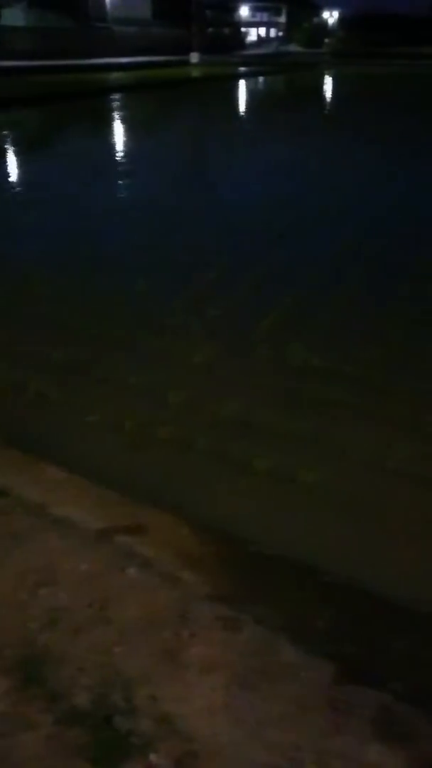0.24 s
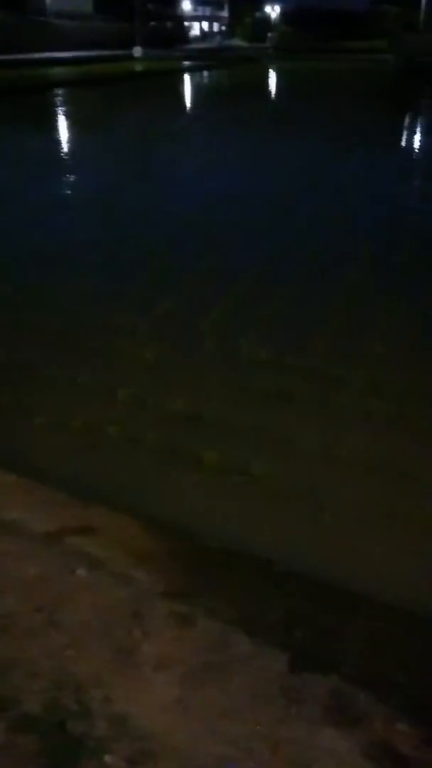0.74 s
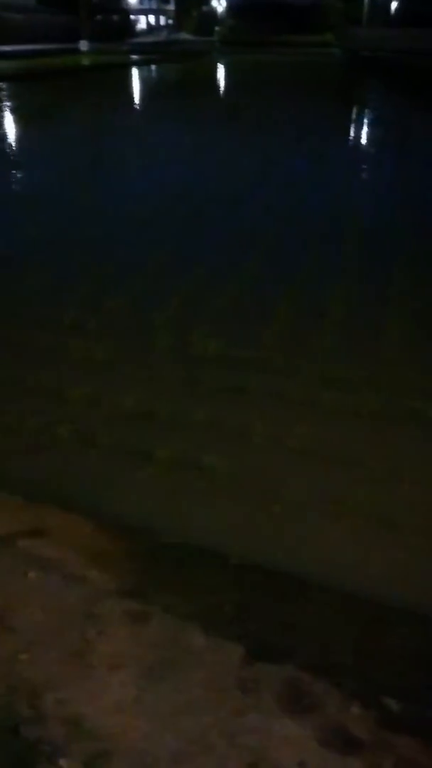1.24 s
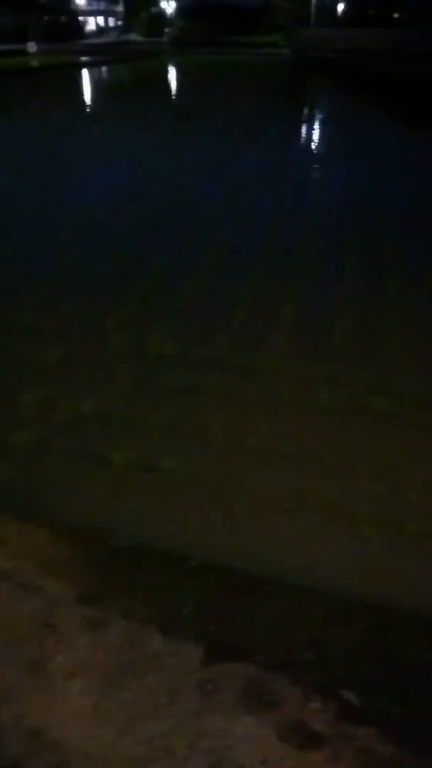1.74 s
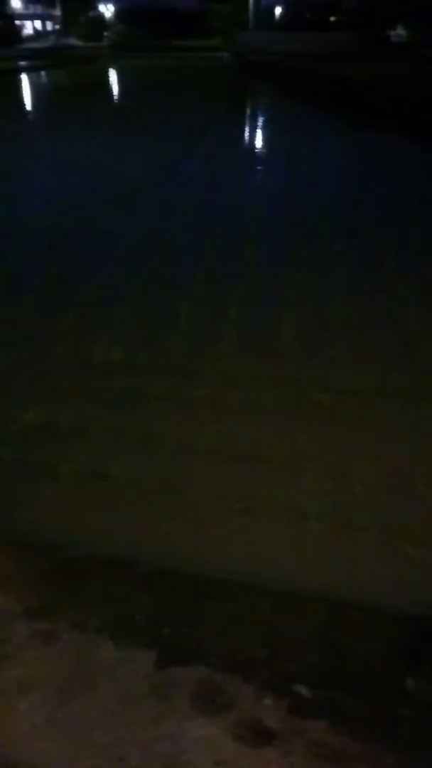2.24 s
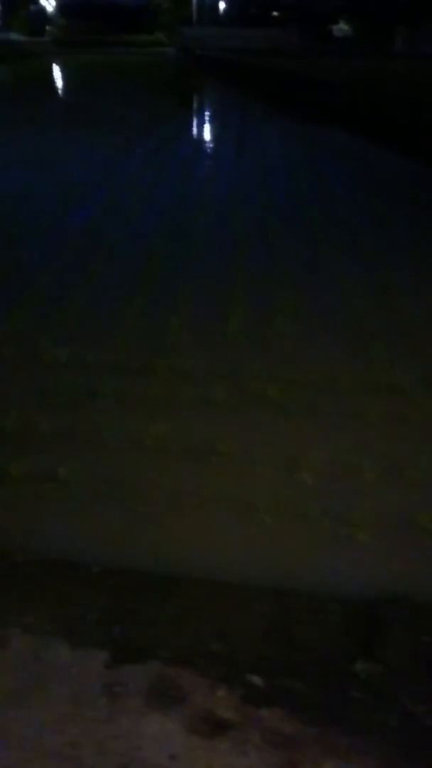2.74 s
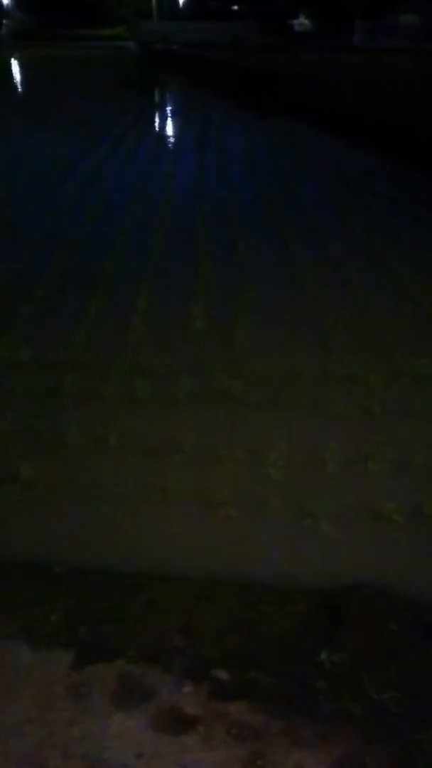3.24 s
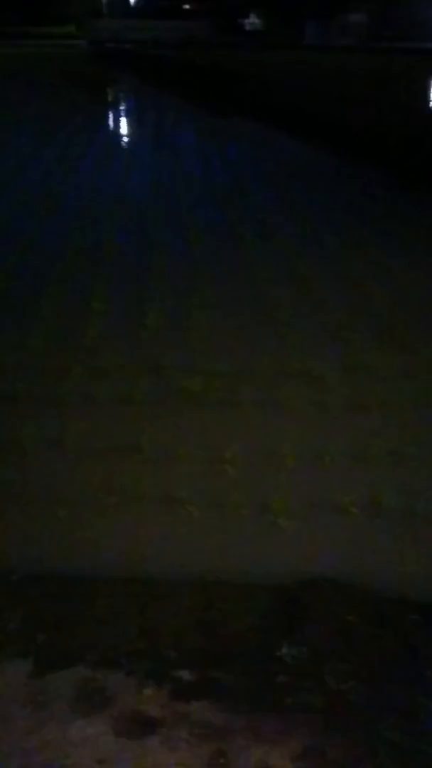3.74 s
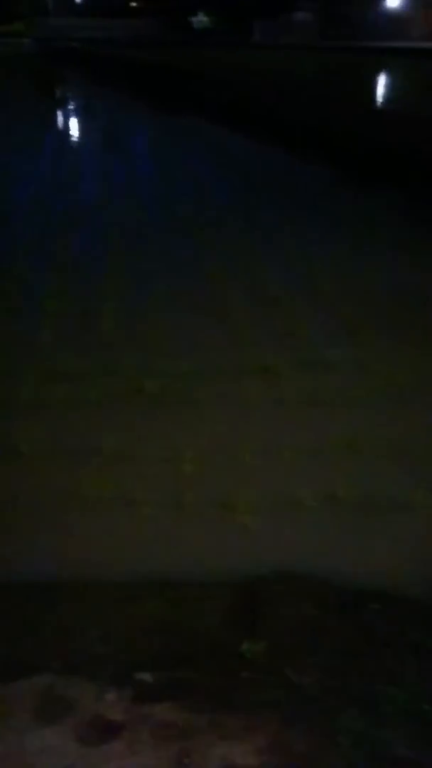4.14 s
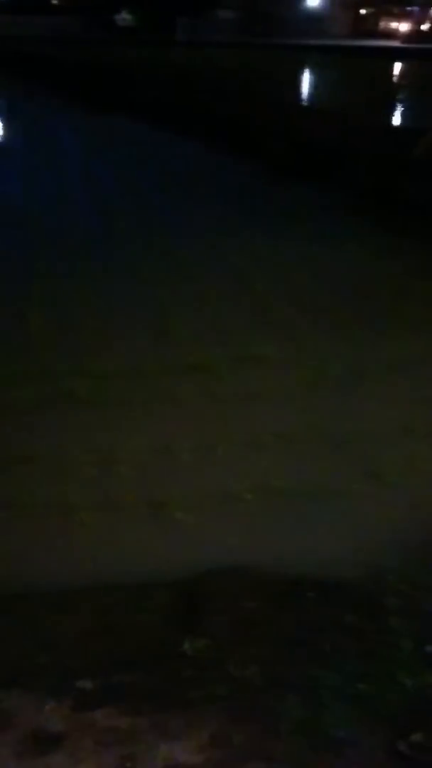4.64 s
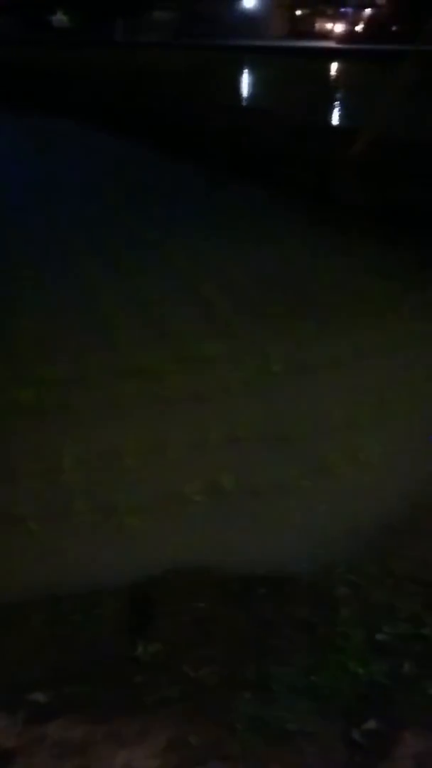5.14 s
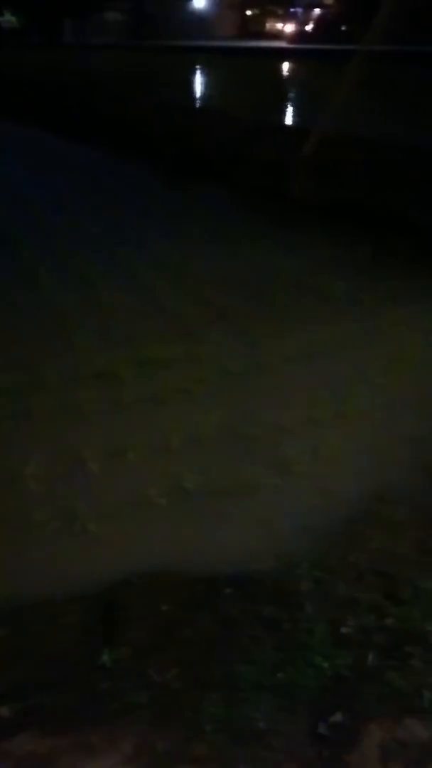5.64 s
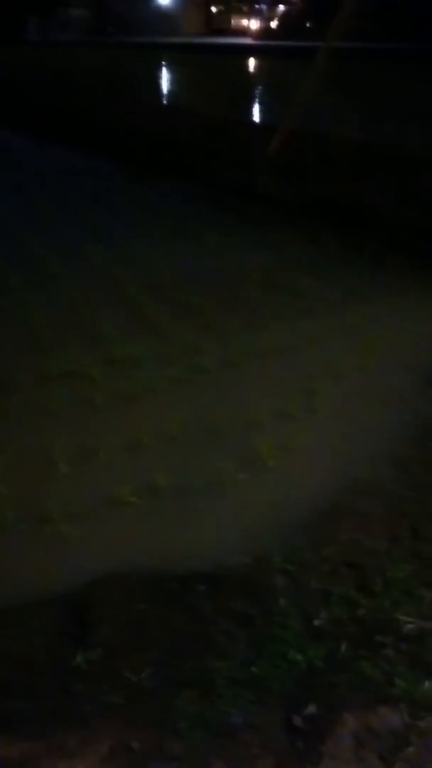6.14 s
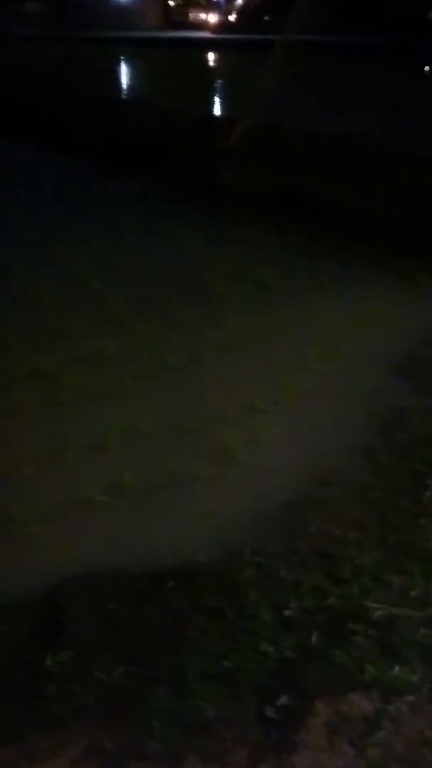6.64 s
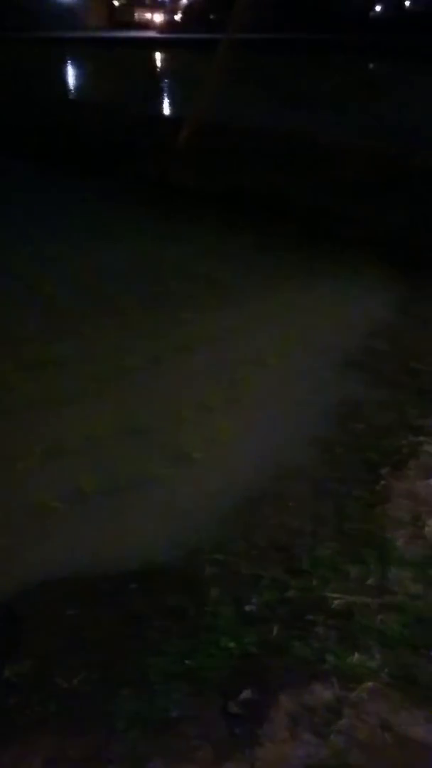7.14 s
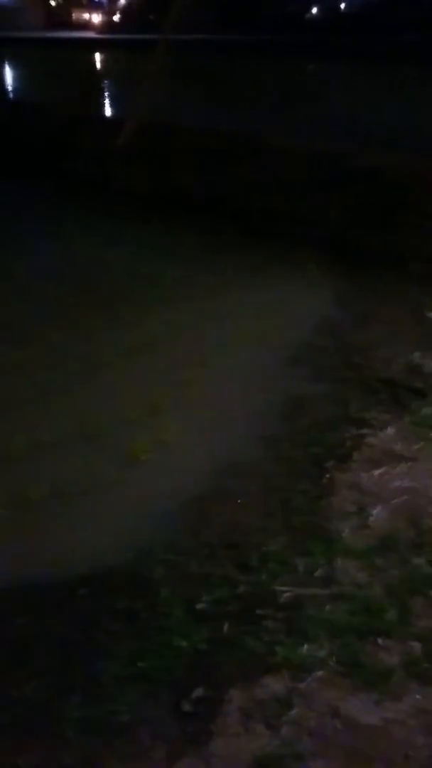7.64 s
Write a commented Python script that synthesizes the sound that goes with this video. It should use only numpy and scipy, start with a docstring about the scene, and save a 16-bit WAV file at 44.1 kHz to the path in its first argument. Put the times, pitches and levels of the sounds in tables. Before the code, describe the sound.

Bright, buzzing croaks from a handful of nearby frogs overlap in even runs throughout, each voice at a slightly different pitch and most a little to the right. Far-off frogs blend into a faint shimmer across the open, flooded field. Low puffs of wind brush the microphone from one side and then the other, bumping it most noticeably toward the end.

```python
"""Frogs croak in even bouts, close by in a flooded field at night, over a far chorus and a low rumble.
Each croak is a source driving a filter: a train of vocal pulses rings the resonances of the throat and
vocal sac, rising in pitch as it goes. Water and banks scatter the calls. The rumble is turbulence:
a light breeze presses on the two ports of the microphone."""
import sys
import numpy as np
from scipy import signal
from scipy.fft import rfft, irfft, next_fast_len
from scipy.io import wavfile
from scipy.ndimage import uniform_filter1d

SR = 44100
rng = np.random.default_rng(int(sys.argv[2]) if len(sys.argv) > 2 else 0)


def generate_wav(signal):
    """Clip the signal to [-1, 1] and save it as 16-bit WAV at the path in sys.argv[1]."""
    frames = np.transpose(np.atleast_2d(signal))
    scaled = np.clip(frames, -1, 1) * 32767
    pcm = np.round(scaled).astype(np.int16)
    wavfile.write(sys.argv[1], SR, pcm)


N = 347067


def undb(db):
    """Amplitude ratio of a level in decibels."""
    return 10 ** (np.asarray(db) / 20)


def unit(x):
    """Normalisation to an rms of 1."""
    return x / np.sqrt(np.mean(x ** 2) + 1e-20)


def sides(pan_db):
    """Level difference: the two gains that put left pan_db above right."""
    return undb(np.array([[pan_db], [-pan_db]]) / 2)


def colour(x, points):
    """Spectral shaping by a curve of (Hz, dB) points."""
    hz, db = np.transpose(points)
    size = next_fast_len(x.shape[-1])
    f = np.maximum(np.arange(size // 2 + 1) * SR / size, 1)
    gain = undb(np.interp(np.log(f), np.log(hz), db))
    return irfft(rfft(x, size) * gain, size)[..., :x.shape[-1]]


def below(x, hz):
    """Zero-phase low-pass filtering."""
    return signal.sosfiltfilt(signal.butter(2, hz, fs=SR, output="sos"), x)


def walk(rate):
    """Smooth random modulation of rms 1, changing about rate times a second."""
    k = int(SR / rate)
    steps = np.repeat(rng.standard_normal(N // k + 1), k)
    return unit(uniform_filter1d(uniform_filter1d(steps, k), k)[:N])


def add(track, sound, start_s):
    """Superposition of a sound on a track."""
    i = int(start_s * SR)
    a, b = max(i, 0), min(i + sound.shape[-1], track.shape[-1])
    if b > a:
        track[..., a:b] += sound[..., a - i:b - i]


def ports(x, lag_ms):
    """Path difference: sound reaches the left port before the right."""
    return np.array([x, np.roll(x, round(lag_ms * SR / 1000))])


def scatter(x, t60_s, size):
    """Diffuse reflections decay exponentially, uncorrelated left and right."""
    t = np.arange(size) / SR
    envelope = np.exp(-np.log(1000) * t / t60_s) * (1 - np.exp(-t / 0.0016))
    tail = unit(rng.standard_normal((2, size)) * envelope) / np.sqrt(size)
    return signal.fftconvolve(x, tail, axes=1)[:, :x.shape[1]]


def ring(age, ring_s):
    """Damped pulse envelope of unit energy: a rounded rise, then exponential decay."""
    return (age / ring_s) ** 2 * np.exp(-age / ring_s) / np.sqrt(ring_s * 3 / 4)


def far_chorus():
    """Incoherent summation: countless distant croaks merge into a fluttering wash over the night air."""
    # Each row: frequency in Hz, relative spectral level in dB.
    spectrum = [(30, -11), (70, -6.5), (150, -3.5), (300, -6), (600, -8.5), (1050, -11), (1600, 4),
                (2300, -7.5), (3350, 2), (4200, -17), (5500, -30.5), (8000, -40), (11000, -69.5),
                (14000, -51)]
    # Each row: time in seconds, gain of the wash in dB.
    swell = [(0, 0.5), (2.999, 3), (5.899, 3.5), (6.9, -4), (7.87, 1.5)]
    common, apart = rng.standard_normal(N), rng.standard_normal((2, N))
    air = below(unit(colour(common + 0.33 * apart, spectrum)), 1300)
    wash = unit(colour(.5 * ports(common, lag_ms=0.13) + apart, spectrum))
    flutter = undb(2 * walk(11) + 2 * walk(350))
    drift = undb(np.interp(np.arange(N) / SR, *np.transpose(swell)))
    chorus = (wash - below(wash, 1100)) * flutter * drift
    return undb(-48.5) * (air * sides(0.79) + chorus * sides(-4))


def gusts():
    """Wind envelope at each port: gusts rise, hold and die away, adding in power to a faint draught."""
    # Each row: start in seconds, hold in seconds, left level in dB, right level in dB.
    gust_events = [(0.103, 0.041, -34, -51), (0.176, 0.058, -49, -19), (.3, 0.22, -67, -29),
                   (0.653, 0.07, -66, -27), (.84, 0.25, -63, -36), (1.72, 0.081, -63, -43),
                   (1.934, 0.026, -62, -31.5), (2.189, 0.031, -68, -35.5), (2.538, 0.076, -50, -36.5),
                   (2.684, 0.27, -44, -45.5), (2.99, .18, -59, -29.5), (3.77, 0.038, -38, -55),
                   (4.05, 0.034, -38.5, -43.5), (4.282, 0.14, -27, -35), (4.508, 0.14, -36.5, -31),
                   (4.729, 0.18, -28.5, -40), (5.033, 0.047, -35, -46), (5.358, 0.24, -47.5, -48),
                   (5.64, 0.034, -29, -54), (5.817, 0.16, -34.5, -51), (6.1, 0.13, -32.5, -50),
                   (6.289, 0.18, -34, -34), (6.525, .15, -47, -36), (6.726, 0.025, -53, -30),
                   (6.958, 0.031, -30, -51), (7.245, 0.039, -32, -23.5), (7.406, 0.15, -38, -24.5),
                   (7.633, 0.28, -39, -26)]
    rise_s, fall_s, calm_db = 0.033, 0.074, [[-61.5], [-51.5]]
    t = np.arange(N) / SR
    power = undb(calm_db) ** 2
    for start, hold, left_db, right_db in gust_events:
        shape = np.exp(-np.maximum(start - t, 0) / rise_s - np.maximum(t - start - hold, 0) / fall_s)
        power = power + (undb([[left_db], [right_db]]) * shape) ** 2
    return np.sqrt(power)


def breeze():
    """Turbulent pressure: eddies rumble on each port separately, and a sharp one thumps."""
    # Each row: frequency in Hz, relative spectral level in dB.
    rumble = [(20, -44), (32, -36), (42, -9), (54, 6.5), (85, 5.5), (115, 2.1), (160, -5.5), (240, -14.5),
              (320, -22.5), (450, -43), (900, -58.5), (2000, -90)]
    # Each row: start in seconds, peak before panning in dB, left minus right in dB.
    buffets = [(0.222, -28, -25), (0.684, -41, -23), (0.945, -36.5, -27), (1.913, -42, -12),
               (4.315, -29, 15), (4.859, -41, 16), (6.99, -31.5, 14), (7.283, -21.5, -17),
               (7.414, -29, -18), (7.452, -29.5, -16.5), (7.527, -32.5, -23), (7.631, -21.5, -10)]
    eddies = rng.standard_normal((2, N)) * undb(4.8 * np.array([walk(70), walk(70)]))
    out = unit(colour(eddies, rumble)) * gusts()
    push = ring(np.arange(SR // 8) / SR, 0.0011)
    thump = signal.sosfilt(signal.butter(4, 55, "high", fs=SR, output="sos"), push)
    thump /= np.max(np.abs(thump))
    for start, peak_db, pan_db in buffets:
        add(out, undb(peak_db) * thump * sides(pan_db), start)
    return out


def port_shading(x):
    """Diffraction round the microphone body colours each port and shifts the phase of the right one."""
    # Each row: frequency in Hz, left gain in dB, right gain in dB, right phase lag in radians.
    port_response = [(1100, -6.5, -0.5, -.3), (1670, -4, -2.5, -0.86), (1990, -3, 3.5, -0.73),
                     (2490, -7, 0.5, -0.7), (2920, 0, 0, 0.32), (3730, -1, -0.5, 0.22),
                     (4700, 4.5, -1.5, .1), (6500, 4.5, -5.5, -.9), (8040, -2.5, 1.5, -0.83),
                     (10500, -3.5, 4, -1.1)]
    size = next_fast_len(N + SR // 10)
    f = np.maximum(np.arange(size // 2 + 1) * SR / size, 1)
    hz, *columns = np.transpose(port_response)
    left_db, right_db, lag = (np.interp(np.log(f), np.log(hz), c) for c in columns)
    response = np.array([undb(left_db), undb(right_db) * np.exp(-1j * lag)])
    return irfft(rfft(x, size) * response, size)[:, :N]


def croak(length, hz, modes, air, pressure, pulse_hz, quicken, glide, jitter, pulses=32):
    """Impulse excitation: each pulse of a quickening train rings the modes and lets out a puff of air."""
    t = np.arange(int(1.25 * length * SR)) / SR
    period_noise, level_noise, pitch_noise = rng.standard_normal((pulses, 3)).T
    rate = pulse_hz * (1 + .02 * rng.standard_normal())
    speedup = 1 + quicken * (np.arange(pulses) / (rate * length) - .5)
    periods = (1 + jitter * period_noise) / (rate * speedup)
    onsets = np.cumsum(periods) - periods[0] * rng.uniform(0.5038, 1)
    progress = onsets / length - .1
    strength = np.interp(progress, *np.transpose(pressure)) * undb(0.22 * level_noise) / np.sqrt(rate)
    pitch = hz * (1 + glide * (np.clip(progress, 0, 1) - .6) + 0.0025 * pitch_noise)
    pulse = np.maximum(np.searchsorted(onsets, t) - 1, 0)
    age = np.maximum(t - onsets[pulse], 0)
    shut = np.minimum(onsets[np.minimum(pulse + 1, pulses - 1)], t[-1])
    closing = np.clip((shut - t) / 0.00056, 0, 1)  # the folds shut before the next pulse
    turns = pitch[pulse] * (age - 10.6 * (age - .0013) ** 2)  # tension sags within each pulse
    out = ring(age, .00065) * air[:len(t)]
    climax = np.exp(-((progress[pulse] - .48) / 0.3) ** 2)  # the last mode speaks at the height of the push
    for k, (multiple, ring_ms, db) in enumerate(modes):
        tone = np.sqrt(2) * np.sin(2 * np.pi * (multiple * turns + rng.random()))
        out += undb(db) * ring(age, ring_ms / 1000) * tone * (climax if k == len(modes) - 1 else 1)
    return out * strength[pulse] * np.sin(np.pi / 2 * closing) ** 2


def bouts(table, length_s, uneven_db=0.96):
    """Periodic calling: a list of evenly spaced croaks that swell or tire through each bout."""
    croaks = []
    for start, end, beat, hz, db, swell_db, *tone in table:
        times = np.arange(start, end, beat)
        for k, time in enumerate(times):
            level_db = db + swell_db * (k - (len(times) - 1) / 2) + uneven_db * rng.standard_normal()
            croaks.append((time, length_s, hz, level_db, *tone))
    return croaks


def frog(croaks, modes, rasp_db, banks_db, lag_ms, **voice):
    """Direct sound and early reflections: one frog's croaks, returned by water and banks."""
    # Turbulent breath. Each row: frequency in Hz, relative spectral level in dB.
    rasp = [(600, -32), (1200, -6), (1600, -2), (2300, 0), (3500, -1), (4200, -10), (5500, -19),
            (8500, -29), (10000, -46), (14000, -66)]
    out = np.zeros((2, N))
    air = undb(rasp_db) * unit(colour(rng.standard_normal(N), rasp))
    for start, length, hz, db, fundamental_db, pan_db, *overtone_db in croaks:
        throat = np.array(modes)
        throat[0, 2] += fundamental_db
        throat[-1, 2] += sum(overtone_db)
        call = croak(length, hz, throat, air[rng.integers(N // 2):], **voice)
        call = ports(np.pad(call, (0, SR // 50)), lag_ms)
        call = call + undb(banks_db) * scatter(call, t60_s=0.02, size=1500)
        # the long waves of the fundamental bend round the microphone and favour its right port
        low = below(below(call, 2400), 2400)
        heard = low * sides(.6 * pan_db - 4) + (call - low) * sides(pan_db)
        add(out, undb(db) * heard, start - length / 10)
    return out


def near_frogs():
    """Resonance sets timbre: six voices, each with its own modes of throat and vocal sac."""
    # Each row: multiple of the main resonance, time constant in ms, gain in dB. The first row is the mode
    # raised by the fundamental boost; the last row is the overtone given the overtone boost, not always the
    # highest mode.
    high_modes = [(0.469, 0.67, 0), (0.799, 0.39, -10.5), (0.996, 0.81, 0), (1.48, 0.66, -30.5),
                  (1.9, 0.49, -41), (2.251, 0.4, -55), (2.972, 1, -62)]
    low_modes = [(0.581, 0.47, 2.5), (0.43, 1, -22), (1.001, 0.78, 1), (1.199, 0.99, -17.5),
                 (1.58, 0.79, -24), (2.201, 0.24, -48.5), (2.85, 0.36, -45.5)]
    mellow_modes = [(0.492, 1, 6), (0.819, 0.4, -7), (0.997, 0.64, 3), (1.5, 0.18, -28), (2, 0.42, -49.5)]
    hoarse_modes = [(.52, 0.84, 1), (0.76, 1, -13), (1.045, 0.29, 3.5), (1.3, 0.26, -24), (3, .15, -36.5)]
    ringing_modes = [(0.487, 0.77, 0.5), (0.821, 0.48, -11), (0.998, 0.84, 4), (1.5, 0.31, -33.5),
                     (2.599, 0.75, -60), (1.979, 0.55, -32.5)]
    bright_modes = [(0.492, 0.63, 5), (.82, 0.35, -5.5), (0.998, 0.69, 1), (1.55, 0.63, -35),
                    (1.998, 0.38, -35), (2.499, .25, -48), (3.13, 0.46, -43.5)]
    # Each row: start, end and beat in seconds, main resonance in Hz, then in dB: gain, swell per croak, # boost
    # of the first mode, leftward pan, boost of the last mode.
    high_bouts = [(.086, .93, 0.24, 3610, -40.5, 1, -0.5, -6, 11),
                  (1.064, 1.65, 0.23, 3630, -40.5, 1, -4, -7, 6),
                  (1.823, 2.25, 0.33, 3614, -37.5, 0, -7.5, -6, 10),
                  (2.512, 3.3, 0.33, 3580, -35.5, -0.9, -7, -4, 0),
                  (3.499, 3.9, .296, 3605, -37.5, -0.5, -8, -1, -5),
                  (4.133, 4.9, 0.32, 3583, -38, -0.3, -6.5, -3, -3),
                  (5.116, 5.55, .324, 3615, -40, 0.5, -6, 0.5, 3),
                  (5.692, 6.55, 0.27, 3500, -39, -0.5, -4, -0.5, -2),
                  (6.683, 7.8, 0.24, 3670, -42.5, -0.5, -2, 3, 0)]
    low_bouts = [(.108, .85, 0.31, 2770, -47, -0.7, -4.5, -8, 0),
                 (1.117, 1.6, 0.37, 2700, -48, -1.5, -4, -9.5, 0),
                 (1.821, 2.2, 0.28, 2750, -47.5, -2, -9, -10, 0.005),
                 (4.432, 5.8, .3145, 2807, -48, 0.5, -8.5, -15, 0),
                 (5.976, 6.7, .31, 2805, -42.5, 1.5, -13.5, -8, 0),
                 (6.942, 7.35, 0.31, 2837, -44, 0, -13.5, -15, 0)]
    mellow_bouts = [(.85, 1.85, 0.31, 3050, -51, .3, 1, -6.5, 0),
                    (2.048, 2.8, .314, 3200, -47, 1.68, -6.5, -5.5, 0.006),
                    (3.088, 4.1, .294, 3141, -46, 0.5, -9, -6, 0.0026),
                    (4.328, 5.05, 0.31, 3120, -45, 1.2, -8.5, -3.5, 0)]
    ringing_bouts = [(3.316, 3.93, 0.24, 3386, -48.5, 0.5, 5.5, 5.5, 6.6),
                     (4.046, 4.9, 0.25, 3360, -48.5, 0.5, 5, 1, 14),
                     (5.089, 5.4, 0.21, 3290, -46.2, 1, 1.5, 0.5, 6.4),
                     (5.524, 6.1, .237, 3297, -41, -0.7, -1, -2, 8.5),
                     (6.261, 6.6, 0.22, 3270, -42, 2, 0, 2, 6.5),
                     (6.74, 7.35, .256, 3315, -40, 0.5, 2, 0.5, 4.5),
                     (7.53, 7.87, 0.26, 3430, -45, 4, -4, 0, 1.8)]
    bright_bouts = [(-.005, .62, 0.25, 3340, -41.5, 0, -6, -9.5, 1.5),
                    (.767, 1.16, 0.28, 3346, -44, -3.5, -7, -5, 6),
                    (1.405, 2.08, 0.29, 3370, -46.5, 1.5, -1.5, -4.5, 13),
                    (2.295, 3, 0.29, 3350, -44.5, -0.5, -3.7, -2.5, 5),
                    (3.643, 4.29, 0.27, 3340, -42.5, -1.5, -8, -4.5, -5),
                    (4.449, 4.85, 0.28, 3380, -39, 2.5, -10, -2.5, -9),
                    (4.998, 5.36, 0.25, 3360, -39, 0, -9, -3, -4),
                    (5.884, 6.52, .265, 3410, -37.5, 2, -11, -4.5, -4),
                    (6.672, 7.04, 0.27, 3320, -39.5, 1, -11, -8.5, -2),
                    (7.195, 7.6, .297, 3347, -36.5, 2.5, -9.5, -1.5, -4)]
    # Croaks off the beat. Each row: start and length in seconds, main resonance in Hz, then in dB: # gain,
    # boost of the first mode, leftward pan.
    mellow_croaks = [(.17, 0.1, 3080, -44, -4.5, 0), (.417, 0.14, 3215, -45.5, -6.5, -4),
                     (.666, .1, 2990, -47, -9.5, -5), (.952, 0.088, 2950, -47, -12.5, -5.5),
                     (2.632, 0.081, 2940, -47, -19, -11.5), (2.948, .11, 3060, -46, -13.5, -5.5),
                     (3.06, .1, 3300, -47, -1.5, 1), (3.422, .062, 3235, -45, -7.5, 0.5),
                     (4.273, .13, 3295, -46.5, -5.5, 1), (7.746, 0.13, 3190, -42, -12.5, -6.5)]
    hoarse_croaks = [(1.472, 0.12, 2650, -49, 2, 1), (1.815, 0.097, 2600, -57.5, 7.5, -5),
                     (2.079, 0.093, 2640, -47, 0.5, -5), (3.404, 0.13, 2700, -46.5, -7.5, -9.5),
                     (3.855, .14, 2690, -46, -4.5, -3), (4.697, 0.058, 2620, -50, -10, -13),
                     (5.244, 0.13, 2680, -49.5, -23, -8), (7.5, 0.094, 2900, -50.5, -3, -19)]
    # Air pressure through a croak. Each row: fraction of its length, relative amplitude.
    swelling = [(-.08, 0), (.1, 0.47), (.55, 0.91), (.9, 0.75), (1.081, 0.045)]
    abrupt = [(-.03, 0.011), (.02, 1.18), (.5, 1.41), (.85, 0.71), (1.08, 0.03)]
    high = bouts(high_bouts, length_s=.088)
    low = bouts(low_bouts, length_s=.089)
    mellow = bouts(mellow_bouts, length_s=.1) + mellow_croaks
    ringing = bouts(ringing_bouts, length_s=.088)
    bright = bouts(bright_bouts, length_s=.097)
    out = frog(high, high_modes, rasp_db=-12, banks_db=-9, lag_ms=.18,
               pressure=swelling, pulse_hz=182, quicken=.12, glide=.05, jitter=.008)
    out += frog(low, low_modes, rasp_db=-17, banks_db=-8, lag_ms=.24,
                pressure=abrupt, pulse_hz=193, quicken=.2, glide=.02, jitter=.01)
    out += frog(mellow, mellow_modes, rasp_db=-14, banks_db=-8, lag_ms=.22,
                pressure=swelling, pulse_hz=176, quicken=.1, glide=.07, jitter=.008)
    out += frog(hoarse_croaks, hoarse_modes, rasp_db=-10.5, banks_db=-5, lag_ms=.12,
                pressure=swelling, pulse_hz=171.3, quicken=.1014, glide=.1, jitter=.0499)
    out += frog(ringing, ringing_modes, rasp_db=-16, banks_db=-12, lag_ms=.21,
                pressure=swelling, pulse_hz=184, quicken=.06, glide=.06, jitter=.008)
    out += frog(bright, bright_modes, rasp_db=-14, banks_db=-10, lag_ms=.2,
                pressure=swelling, pulse_hz=176, quicken=.1, glide=.09, jitter=.008)
    return out


def scene():
    """Superposition of near frogs, their faint reverberation, the far chorus and the breeze."""
    frogs = port_shading(near_frogs())
    reverberation = undb(-12.5) * scatter(frogs, t60_s=0.12, size=22000)
    return frogs + reverberation + far_chorus() + breeze()


def record(dry):
    """Band limiting: a steep low-pass filter cuts the top of the treble."""
    top_hz = 11300
    return signal.sosfilt(signal.ellip(8, .2, 70, top_hz, fs=SR, output="sos"), dry)


dry = scene()
out = record(dry)
generate_wav(out)
```